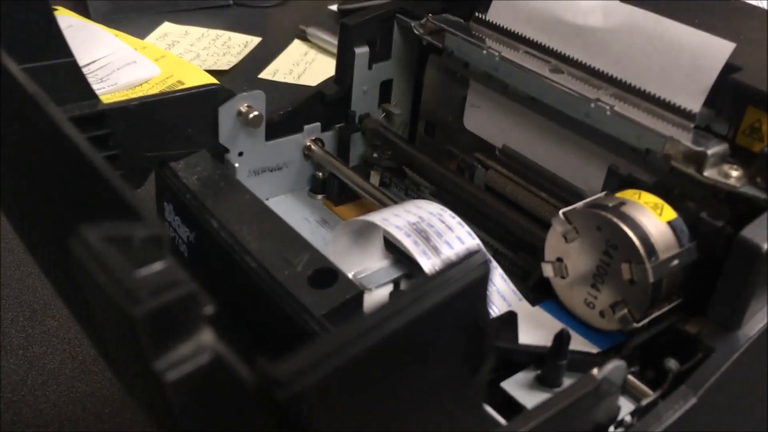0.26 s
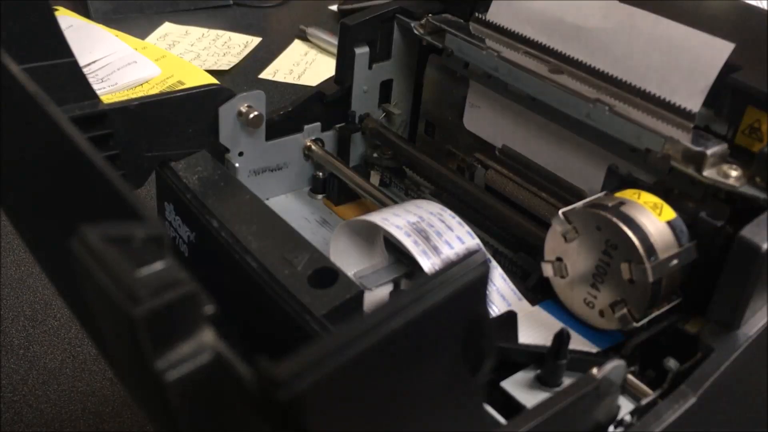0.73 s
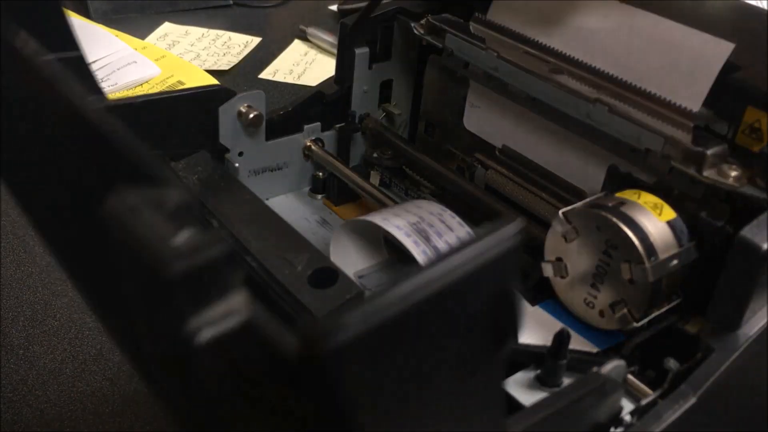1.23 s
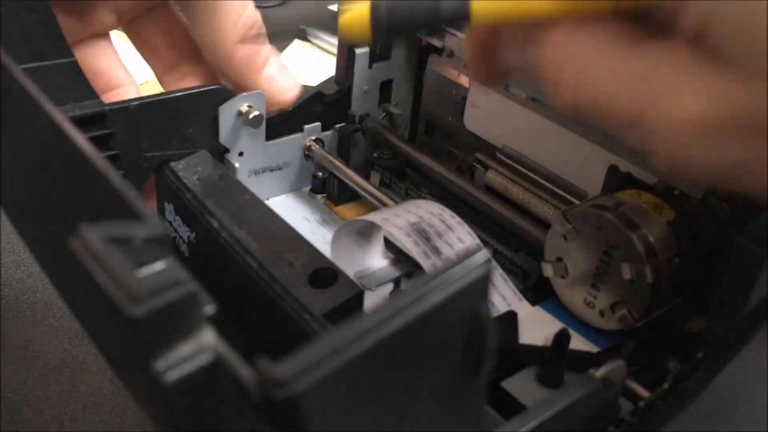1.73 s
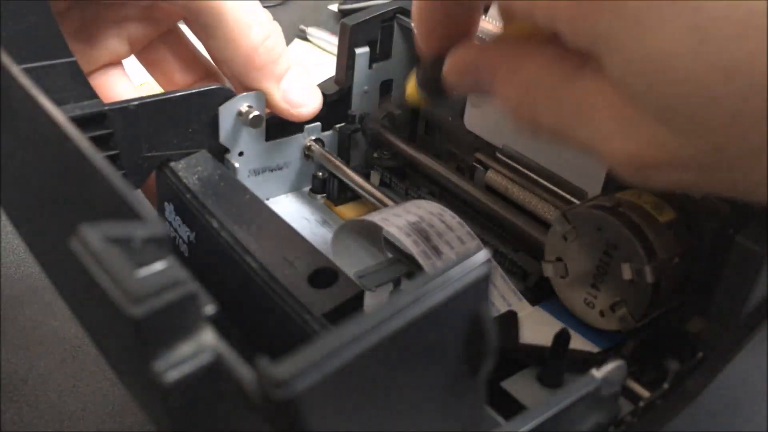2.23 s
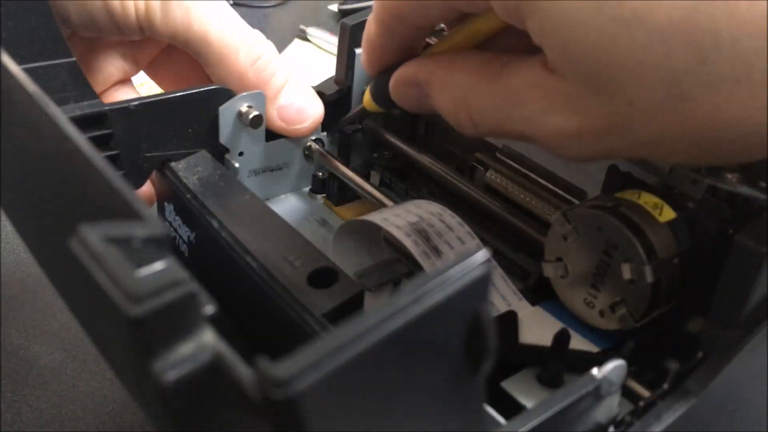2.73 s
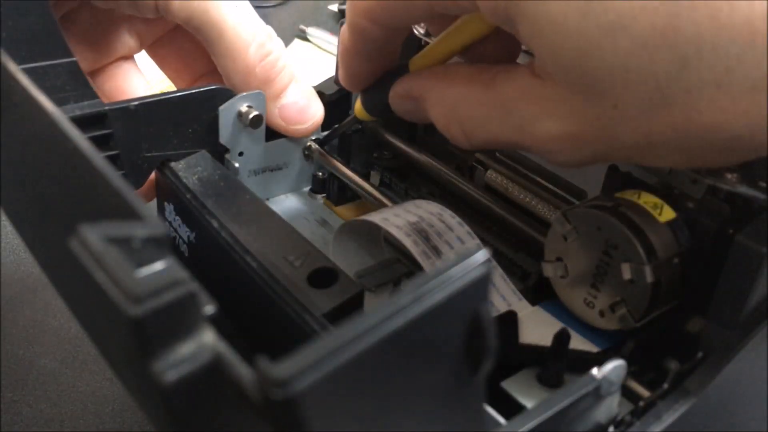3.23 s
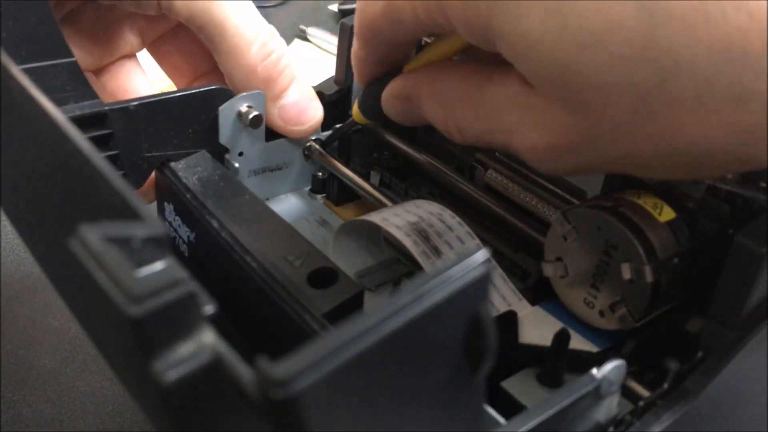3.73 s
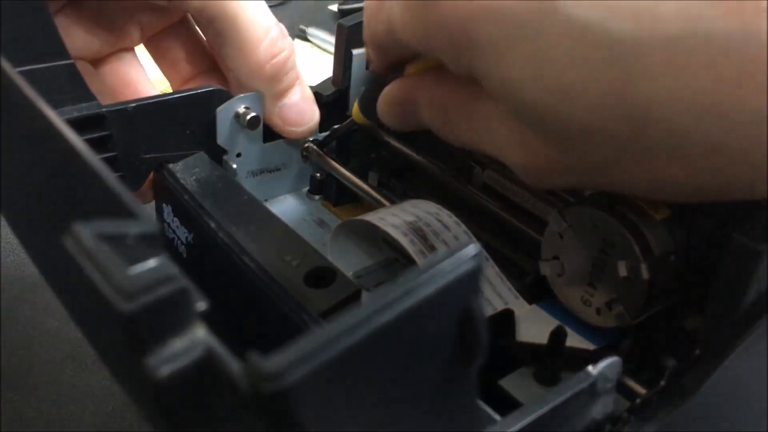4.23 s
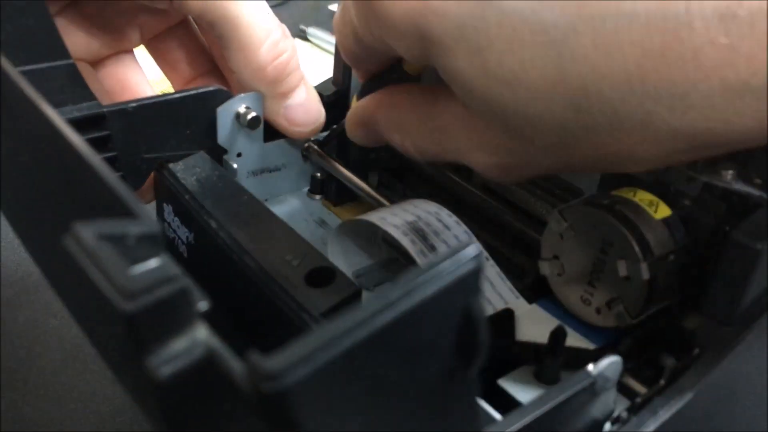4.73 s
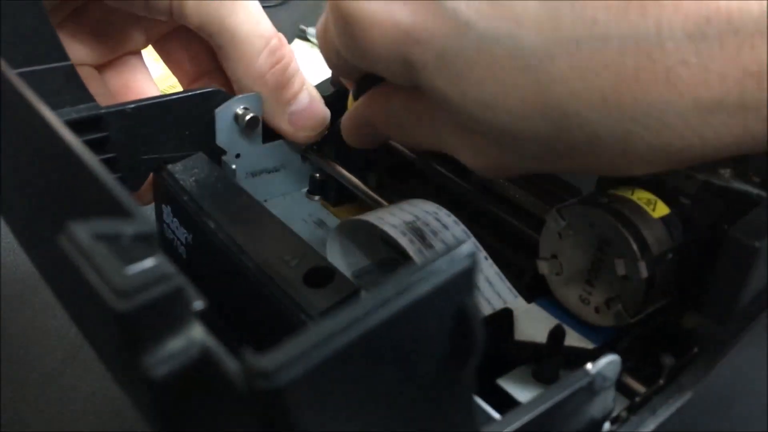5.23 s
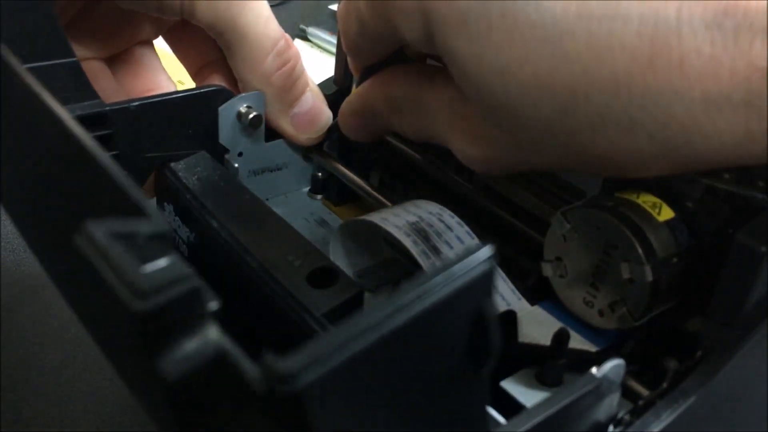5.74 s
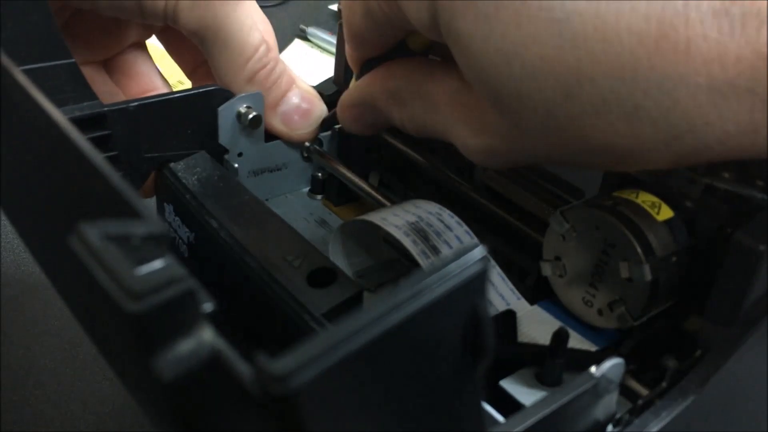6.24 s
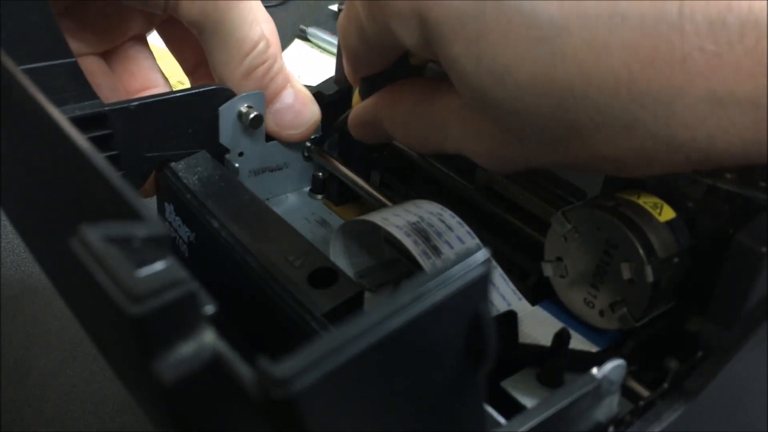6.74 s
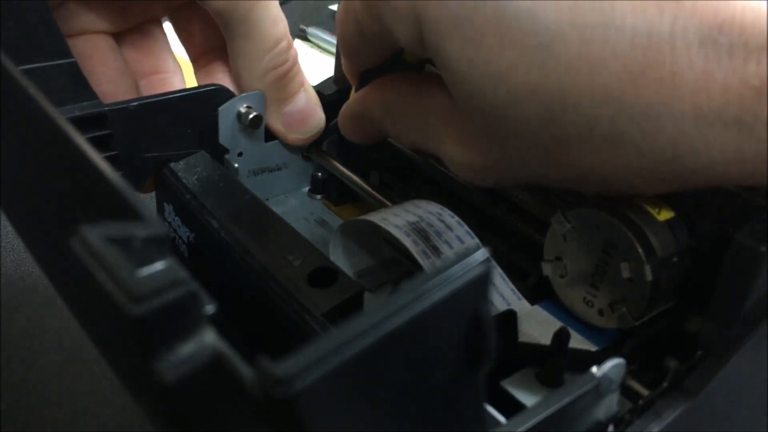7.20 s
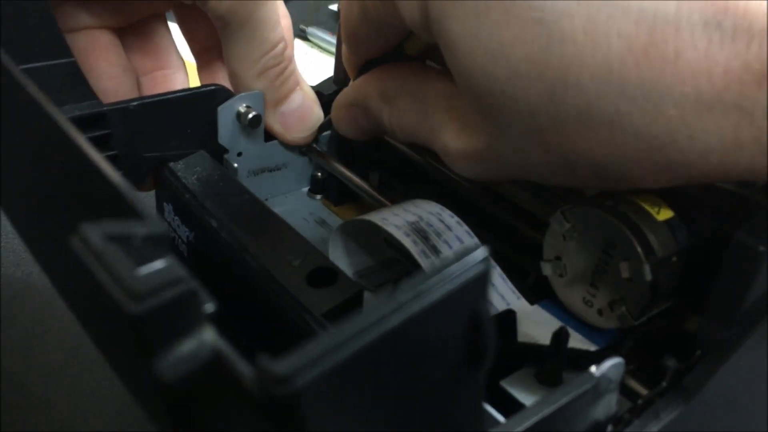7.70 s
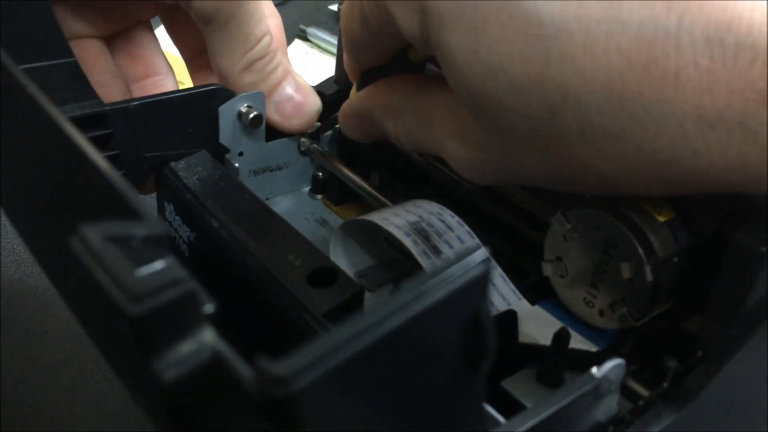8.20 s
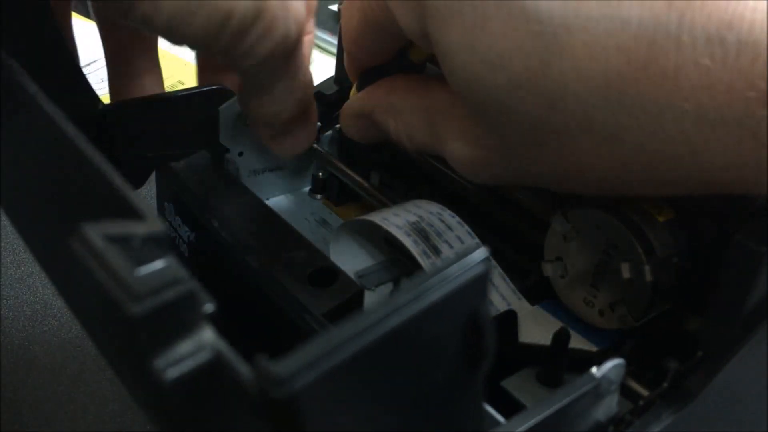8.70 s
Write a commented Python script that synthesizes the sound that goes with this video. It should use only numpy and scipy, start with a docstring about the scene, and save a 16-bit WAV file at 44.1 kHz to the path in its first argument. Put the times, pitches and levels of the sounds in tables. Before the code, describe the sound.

Close-up, in a small dry room with soft low rumble, faint hiss and tiny handling noises. The first second is nearly still, with a faint tick and a light plastic knock at 0.5. From 1.0 to 1.4 a loose metal tool is picked up: small jingles, then a quick cluster of crisp clacks and hollow case knocks. Low, woody desk creaks stutter until about 2.5. From 2.5 to 4.8 the work is delicate: sparse dry steel ticks, two sharper ones near 3.5, very light taps. Firmer slips knock the hollow plastic at 4.9 and, loudest so far, 5.4; a sharp tick comes at 6.1, more knocks at 7.0 and 7.2. At 7.5 the steel clip springs free with an extremely loud, bright, hissy crack and very short high ring. Solid hollow knocks follow at 7.8 and 8.2, with light ticks, finger rubbing and soft bumps to the end, about 9.

```python
"""A small screwdriver pries a steel circlip inside an open plastic machine case on a desk, close to a microphone.
Throughout, the tip ticks on steel (noise cracks, damped pitch), slips knock the hollow case (forced resonances)
and fingers rub it (jolted noise). From 1 s a loose tool jingles as it is picked up and, until 2.5 s, the desk creaks
under a leaning arm (stick-slip jerks). At 7.5 s the circlip springs free and rings (damped sines); work goes on.
A short room tail follows all this; under it lie room rumble, small contacts of the hands and microphone hiss."""
import sys
import numpy as np
from scipy import signal
from scipy.fft import rfft, irfft, next_fast_len
from scipy.io import wavfile
from scipy.ndimage import uniform_filter1d, map_coordinates

SR = 44100
rng = np.random.default_rng(int(sys.argv[2]) if len(sys.argv) > 2 else 0)


def bounce(signal):
    """Save signal as a 16-bit WAV file at the path given by the first command-line argument."""
    frames = np.transpose(np.atleast_2d(signal))
    limited = np.clip(frames, -1, 1)
    pcm = np.round(limited * 32767).astype(np.int16)
    wavfile.write(sys.argv[1], SR, pcm)


N = 395136

# Tip on steel: (time [s], nominal level [dB], relative low part [dB], strongest pitch [Hz], its relative level [dB])
TICK_EVENTS = [(0.0242, -51.5, 7, 4060, -18), (0.4968, -42.5, 4, 4320, -22), (1.0311, -48, -5, 5570, -6),
               (1.0898, -41, -6, 6220, -11), (1.1134, -36, -8.5, 9570, -11), (1.1953, -51, -4, 6030, -2),
               (1.2083, -41, -5, 6010, -10), (1.3067, -23.5, -1.5, 8880, -12),
               (1.3239, -29.5, 2.5, 5900, -3), (1.3918, -39, 5, 4250, -14), (1.4039, -31, 4, 4400, -13),
               (1.4099, -20.5, -6, 4500, -13.5), (1.4329, -30, -4, 4700, -10),
               (1.921, -35.5, -24, 7190, -11), (2.2009, -42, -20, 4170, -9.5),
               (2.263, -55.5, -5, 4240, 2.5), (2.5726, -42.5, -13, 5500, -13),
               (2.6372, -40, -9.5, 5700, -12.5), (2.7763, -48, -14, 4260, -18),
               (2.836, -38, -14, 13900, -25), (3.0492, -37.5, -11.5, 5700, -18),
               (3.272, -45.5, -8, 5600, -13), (3.326, -38.5, -14, 5660, -19), (3.3947, -53, -9, 5560, -7),
               (3.4285, -46.5, -10.5, 11700, -12), (3.4964, -44, -8, 15100, -10),
               (3.5064, -25, -21, 12100, -18), (3.5497, -42, -6, 5900, -3), (3.5674, -24, -13, 12400, -10),
               (3.6548, -45.5, -8, 11700, -12), (3.9413, -41.5, -13, 5940, -20),
               (4.2044, -43, -21, 4160, -7), (4.2825, -45, -24, 11000, -11), (4.3745, -48, -7, 12000, -10),
               (4.4753, -46.5, -6, 6700, -16), (4.663, -37.5, -8.5, 11550, -6),
               (4.7136, -38.5, -8.5, 7200, -18), (4.7258, -46, -8, 12300, -10),
               (4.9186, -28.5, -12.5, 8630, -17), (4.9927, -48, -9, 12000, -14),
               (5.038, -40.5, -9, 12200, -9), (5.2131, -51.5, -6, 4300, -15),
               (5.3572, -35.5, -7.5, 4560, -19), (5.3976, -25.5, -9, 5260, -16),
               (5.572, -44, -9, 6700, -16), (6.0743, -42.5, -4, 13500, -13),
               (6.094, -22.5, -10.5, 4400, -20), (6.2833, -54.5, 4, 4150, -18),
               (6.354, -45.5, -7, 4300, -12), (6.3917, -30, -12, 4170, -16),
               (6.456, -40.5, -16, 11900, -14), (6.5998, -48.5, -4, 12500, -10), (6.6466, -53, 7, 3860, -8),
               (6.7267, -47, -5.5, 3980, -12), (6.7612, -45, -10, 12100, -10), (6.771, -43, -3, 4500, -21),
               (6.805, -57, 8.5, 6200, -14), (6.9302, -47.5, -13, 11900, -12),
               (7.007, -46.5, -8, 11140, -8), (7.1657, -38, -6, 5150, -15), (7.454, -65, 7, 13700, -10),
               (7.4797, -4.5, -17, 14000, -12), (7.7618, -40, 1, 5200, -10), (7.91, -54.5, 1, 3950, -16),
               (7.949, -48.5, -2.5, 9600, -17), (8.0018, -46, -7, 4400, -16), (8.0396, -47, -3, 4270, -8),
               (8.0663, -49.5, -6, 6200, -14), (8.1723, -35.5, -2.5, 5250, -12),
               (8.338, -55, -3, 11800, -9), (8.3627, -42, -9, 7000, -12)]
# Crack spectrum: (frequency [Hz], relative density [dB])
CRACK_SPECTRUM = [(1200, -7), (2500, -1), (4000, -3.5), (6000, -5.5), (8000, -5.5), (12000, -4),
                  (15000, -5.5), (16400, -24.5)]
CRACK_SCALE_S, SKID_S, SPLIT_HZ = 0.018, 0.0017, 6000
# Light touches at random while the tip works
FAINT_PER_S, FAINT_FLOOR_DB, FAINT_SPREAD_DB, FAINT_PITCH_DB, WORK_FROM_S = 4.7, -62.5, 2, -3, 1.2

# Circlip springing free: (time [s], nominal level [dB])
SNAP_EVENT = (7.481, -36)
# Circlip modes: (frequency [Hz], relative level [dB], t60 [s])
CLIP_MODES = [(1520, 4, .05), (2606, -2, .06), (9540, -3, .06), (9840, 0, .06), (11170, -3, .07),
              (11550, -2, .07), (13950, 2, .06), (14200, 2, .06), (15270, -2, .07)]
# Loose tool picked up: (time [s], nominal level [dB])
JINGLE_EVENTS = [(1.0314, -78), (1.0413, -60.5), (1.0897, -62), (1.114, -50.5), (1.1942, -76),
                 (1.2093, -47)]
# Tool shaft modes: (frequency [Hz], relative level [dB], t60 [s])
SHAFT_MODES = [(2510, -2, 0.069), (5460, -2, 0.037), (6040, 9, 0.025), (9620, 7, 0.018)]

# Blows on the case: (time [s], nominal level [dB], relative desk thump [dB], relative case floor [dB],
# relative thin panels [dB], wall pitch favoured by the struck spot [Hz])
KNOCK_EVENTS = [(0.024, -49, -14, -9, -2, 528), (0.499, -37.5, -31, -7.5, -6.5, 770),
                (0.907, -46.5, -13, 2.5, -29, 438), (1.085, -51, -36, -16, -24, 415),
                (1.309, -36.5, -2, -26, -8, 452), (1.324, -42, 3.5, 1, -7, 334),
                (1.403, -35, -13, -5, -5, 444), (1.414, -31, -11, -13, -4.5, 660),
                (1.43, -32, -9.5, -12, 0, 947), (1.873, -39.5, -1, -7, -14.5, 480),
                (2.876, -57.5, -14, -11, -6, 627), (2.922, -55, -6, -22, -3, 444),
                (2.999, -55.5, -1, -23, -14, 583), (3.053, -50, -8, -23, -0.5, 412),
                (3.322, -61.5, 1, 1, 2.5, 466), (3.507, -56.5, -13, -18, -3, 363),
                (3.565, -51, -17, -28, 1, 536), (3.768, -52.5, -9, -22, -13, 455),
                (3.943, -50.5, 1, -7.5, -8.5, 394), (4.205, -49.5, -8, -24, -7, 638),
                (4.479, -57, -12, -10, -2, 334), (4.715, -54, -5, -6, -3, 331),
                (4.942, -30.5, -6.5, -10.5, -14, 564), (5.037, -53, -1, -16, -8.5, 579),
                (5.189, -51.5, -11, -17, -8.5, 336), (5.398, -21, -7.5, -13.5, -12, 565),
                (5.569, -44, -5, -4, -11, 331), (5.614, -52.5, -11, -3, -3.5, 829),
                (5.679, -58, 2, -18, -4.5, 635), (5.832, -48, -9, -12, -15, 650),
                (5.949, -58, -9, -21, -2, 851), (6.02, -55, -10, -11, -11, 471),
                (6.09, -40, 0.5, -15, -4, 390), (6.183, -57, -4, -6, -30, 390),
                (6.286, -46, -4.5, -12, -6.5, 630), (6.333, -43.5, 0, -1, -11.5, 338),
                (6.647, -49, -10, -7, -3, 581), (6.771, -59.5, 2, -23, 4.5, 331),
                (6.805, -63, -4, -23, 8, 638), (6.911, -54, 6, -19, -6, 471),
                (6.976, -38.5, -2, -10, -16, 467), (7.107, -49.5, -7, -19, -8, 624),
                (7.168, -29, -7.5, -9, -13.5, 587), (7.26, -53.5, -15, -11, -10, 463),
                (7.311, -60, -4, 5, -21, 401), (7.334, -57, -5, 6, -23, 331),
                (7.359, -50, -11, -15, -37, 400), (7.383, -56.5, -5, -8, -26, 377),
                (7.407, -41.5, -13, -8, -34, 416), (7.482, -25.5, -12.5, -15.5, -10, 479),
                (7.624, -56, -7, -8, -21, 331), (7.764, -21.5, -9, -8, -9, 468),
                (7.999, -55.5, 1, -6, -5, 589), (8.043, -64, 1, -12, 4.5, 425),
                (8.07, -58.5, -19, -16, -1, 479), (8.171, -25, -10, -10, -13.5, 560),
                (8.467, -49, -8, 4.5, -22, 431), (8.551, -49.5, 0, 5.5, -26, 678),
                (8.78, -50.5, 0.5, -5, -12, 653), (8.86, -39, -9, -14, -15, 660)]
# Case wall modes: (frequency [Hz], width [Hz], relative level [dB])
WALL_MODES = [(340.4, 67, -1.5), (395.5, 96, -2), (479, 95, 2), (572, 142, 2), (640, 115, 2.5),
              (770, 142, -2), (882, 99, -4.5)]
# Thin panel modes: (frequency [Hz], width [Hz], relative level [dB])
PANEL_MODES = [(997, 400, -3.5), (1210, 94, 3.5), (1237, 45, 4), (1504, 273, -1.5), (1743, 81, -1.5),
               (2320, 270, -10), (3260, 730, -17.5)]
# Case floor modes: (frequency [Hz], width [Hz], relative level [dB])
FLOOR_MODES = [(144, 59, -3.5), (166.3, 31.7, 1.5), (215, 20, -4), (295, 16.7, -12.5)]
# Desk modes: (frequency [Hz], width [Hz], relative level [dB])
DESK_MODES = [(58.1, 11.4, -0.5), (114.4, 20, 4)]
CONTACT_SCALE_S, PUSH_RISE_S = 0.0091, 0.0024
PRESS_LEAD_S, LOWER_DELAY_S = 0.001483, 0.0025  # contact starts before the listed time; floor and desk lag it

# Scrapes and rubs: (start [s], length [s], level through the case [dB], gritty treble level [dB])
RUB_EVENTS = [(0, 0.033, -70, -88), (0.143, 0.26, -86, -73), (1.3, 0.034, -42, -53),
              (1.35, 0.061, -53, -57), (1.394, 0.05, -51.5, -76), (1.436, 0.048, -51.5, -60.5),
              (1.468, 0.064, -58.5, -53), (1.598, .14, -59, -62), (1.862, 0.11, -67.5, -62.5),
              (2.17, 0.051, -70, -70), (2.312, 0.15, -69, -72.5), (4.178, 0.059, -60.5, -61.5),
              (4.274, 0.017, -88, -69.5), (4.874, 0.1, -60.5, -70.5), (5.008, 0.043, -67, -70),
              (5.554, 0.033, -48.5, -80), (6.09, 0.024, -45, -63), (6.329, 0.087, -64, -69),
              (6.415, 0.094, -64.5, -71), (6.988, 0.15, -68, -80), (7.3, 0.085, -77.5, -101),
              (7.451, 0.014, -51.5, -71), (7.5, 0.054, -73, -64), (7.583, 0.31, -77, -76),
              (8.309, 0.062, -56.5, -66.5), (8.43, 0.11, -61, -65.5), (8.521, .1, -61.5, -65),
              (8.72, 0.2, -64, -70), (8.855, 0.037, -51.5, -65.5), (8.874, 0.077, -66, -65.5)]
# Rubbing through the case: (frequency [Hz], relative density [dB])
SCUFF_SPECTRUM = [(150, -10), (300, 5), (600, -0.5), (1000, -3.5), (1600, -5), (2500, -17.5), (4000, -71)]
# Gritty treble: (frequency [Hz], relative density [dB])
GRIT_SPECTRUM = [(1200, -44), (2500, 4.5), (3500, 3.5), (5000, -6.5), (6000, -0.5), (9000, -4), (12000, -1),
                 (15500, -5), (16500, -64)]
RISE_SHARE, FADE_T60_S = 0.32, 0.052  # a stroke swells over this share of its length, holds, then dies

# Bouts of desk creaking, each a list of: (time [s], jerks so far [count], nominal level [dB])
CREAK_BOUTS = [
    [(1.033, 0, -56), (1.259, 6, -54)],
    [(1.583, 0, -50), (1.707, 4, -45), (1.837, 8, -50)],
    [(2.042, 0, -55), (2.126, 3, -42), (2.201, 6, -43), (2.264, 9, -48), (2.314, 11, -41), (2.433, 15, -43),
     (2.529, 17, -46)],
]
# Desk joint modes: (frequency [Hz], width [Hz], relative level [dB])
JOINT_MODES = [(179, 35, 4.5), (244, 24, 7), (430, 45, 1), (740, 280, -7.5), (970, 160, -5.5),
               (1390, 500, -19), (1606, 200, -16), (2350, 170, -27.5)]
JERK_JITTER_S, JERK_SPREAD_DB = 0.0015, 2.5

# Room decay: (frequency [Hz], t60 [s])
ROOM_DECAY = [(200, 0.28), (1000, 0.13), (4000, 0.082), (12000, 0.07)]

# Background: (time [s], rumble level [dB], handling level in the case [dB], hiss level [dB])
GROUND_LEVELS = [(0.0, -55, -59, -75), (0.3, -59, -64.5, -71.5), (0.87, -58, -67, -75.5),
                 (1.3, -57, -67.5, -74.5), (1.49, -52, -58, -67), (2.02, -55.5, -70.5, -75),
                 (2.32, -57, -61, -74.5), (2.54, -52, -73.5, -78.5), (2.82, -59.5, -69, -77.5),
                 (4.04, -57.5, -71, -78), (4.39, -57.5, -63, -74.5), (4.77, -57.5, -69.5, -79.5),
                 (6.81, -54, -70, -80), (7.39, -57, -66.5, -79), (7.68, -57.5, -69, -70.5),
                 (8.21, -56.5, -69.5, -80), (8.83, -57, -70.5, -69), (8.96, -51, -60, -67)]
# Room rumble: (frequency [Hz], relative density [dB])
RUMBLE_SPECTRUM = [(13, -6), (22, -13.5), (49, 4.5), (71, 0.5), (330, -29), (430, -27), (730, -120)]
# Handling in the case: (frequency [Hz], relative density [dB])
HANDLING_SPECTRUM = [(88, -39), (150, -1), (275, -5), (546, -10), (639, -10), (789, -18.5), (1170, -14.5),
                     (1930, -25), (2240, -24), (3500, -38.5), (4550, -75), (7700, -120)]
# Microphone hiss: (frequency [Hz], relative density [dB])
HISS_SPECTRUM = [(900, -58), (1800, -6), (2600, -1), (3600, -1), (4870, -7), (5900, -1.5), (7770, -7.5),
                 (9320, -0.5), (10300, -8.5), (12100, -0.5), (15100, -8.5), (15800, 7), (16500, -53)]

BASS_CORNER_HZ, TOP_HZ = 38, 16600


def ticks():
    """The tip skids in and bites: a noise crack in low and high parts, plus one heavily damped pitch."""
    events = np.vstack([TICK_EVENTS, faint_ticks()])
    time_s, level_db, low_db, pitch_hz, pitch_db = events.T[:, :, None]
    t = np.arange(SR // 16) / SR
    skid = amp(level_db) * np.minimum(t / SKID_S, 1) ** 3
    u = np.maximum(t - 0.0018, 0) / CRACK_SCALE_S
    decay = amp(-9.5 - 51 * u) + amp(-22 - 90 * u)
    burst = skid * decay * rng.standard_normal((len(events), len(t)))
    pitch = amp(pitch_db - 126 * u) * skid * np.sin(2 * np.pi * pitch_hz * t)

    def low_share(hz):
        """Smooth crossover gain of the low part."""
        return 1 / (1 + (hz / SPLIT_HZ) ** 6)

    start_s = np.maximum(time_s[:, 0] - 0.0015, 0)
    low = filtered(place(start_s, burst * amp(low_db + 9.5)),
                   lambda hz: amp(along(CRACK_SPECTRUM, hz)) * low_share(hz))
    high = filtered(place(start_s, burst),
                    lambda hz: amp(along(CRACK_SPECTRUM, hz)) * (1 - low_share(hz)))
    return low + high + place(start_s, pitch)


def faint_ticks():
    """Random rows like TICK_EVENTS for the lightest touches, with exponentially spread levels."""
    span_s = N / SR - WORK_FROM_S
    when, size, low, pitch = rng.random((int(FAINT_PER_S * span_s), 4)).T
    time_s = WORK_FROM_S + span_s * when
    level_db = FAINT_FLOOR_DB - FAINT_SPREAD_DB * np.log(size)
    pitch_hz = 4000 * 3.5 ** pitch
    return np.transpose([time_s, level_db, 18 * low - 16, pitch_hz, np.full(len(when), FAINT_PITCH_DB)])


def ringing(events, modes):
    """Struck steel as damped sines, their strengths redrawn for every touch."""
    time_s, level_db = np.transpose(events)[:, :, None]
    t = np.arange(SR // 8) / SR
    strength_db = rng.normal(0, 0.7, (len(time_s), len(modes)))
    sound = 0
    for k, (hz, mode_db, t60_s) in enumerate(modes):
        envelope = amp(level_db + mode_db + strength_db[:, [k]] - 60 * t / t60_s)
        sound = sound + envelope * np.sin(2 * np.pi * hz * t)
    return place(time_s[:, 0], sound)


def knocks():
    """A chattering contact shakes panels, walls and, a moment later, the floor; the desk takes a smooth push."""
    time_s, level_db, thump_db, floor_db, panel_db, spot_hz = np.transpose(KNOCK_EVENTS)[:, :, None]
    u = np.arange(SR // 7) / SR / CONTACT_SCALE_S * np.ones(time_s.shape)
    chatter = rng.standard_normal(u.shape) * np.sqrt(u)
    force = chatter * (np.exp(-3.5 * u) + 0.077 * np.exp(-1.1 * u))
    # light panels: a quicker first burst, then a stronger rattling tail
    tap = chatter * (np.exp(-4.5 * u) + 0.15 * np.exp(-1.2 * u))
    push = -u * np.exp(-u * CONTACT_SCALE_S / PUSH_RISE_S)
    # wall modes lose 5 dB per octave away from the spot's pitch
    spot_modes = [(hz, width_hz, mode_db - 5 * np.abs(np.log2(hz / spot_hz)))
                  for hz, width_hz, mode_db in WALL_MODES]
    walls = amp(-1.0) * body(force, spot_modes)
    panels = amp(panel_db + 5.5) * body(tap, PANEL_MODES)
    floor = amp(floor_db + 1.5) * body(force, FLOOR_MODES)
    thump = amp(thump_db + 1.5) * body(push, DESK_MODES)
    start_s = time_s[:, 0] - PRESS_LEAD_S
    upper = place(start_s, amp(level_db) * (walls + panels))
    return upper + place(start_s + LOWER_DELAY_S, amp(level_db) * (floor + thump))


def rubs():
    """Friction noise in strokes; the same jolts feed the case and the grit."""
    start_s, length_s, scuff_db, grit_db = np.transpose(RUB_EVENTS)[:, :, None]
    t = np.arange(SR // 2) / SR
    rise = np.minimum(t / (RISE_SHARE * length_s), 1) ** 2
    stroke = rise * amp(-60 * np.maximum(t - length_s, 0) / FADE_T60_S)
    scuff = place(start_s[:, 0], amp(scuff_db) * stroke) * noise(SCUFF_SPECTRUM, patchy_db=3.0)
    grit = place(start_s[:, 0], amp(grit_db) * stroke) * noise(GRIT_SPECTRUM, patchy_db=3.0)
    return jolts(260, spread_db=3.5, t60_s=0.085, steady=1.0) * (scuff + grit)


def jolts(rate_per_s, spread_db, t60_s, steady):
    """Friction catches at random with a sharp start and decay, over a steady part; running rms held near 1."""
    catches = (rng.random(N) < rate_per_s / SR) * amp(spread_db * rng.exponential(size=N).clip(0, 3))
    decay = amp(-60 * np.arange(SR // 8) / SR / t60_s)
    level = steady + signal.fftconvolve(catches, decay)[:N]
    return level / np.sqrt(uniform_filter1d(level ** 2, SR // 10))


def creak():
    """Each stick-slip jerk rings the joint: an impulse, a weaker opposite slip and faint dying noise."""
    time_s, level_db = slips().T[:, :, None]
    t = np.arange(SR // 40) / SR
    second_s = np.round(rng.uniform(0.00635, 0.0101, time_s.shape) * SR) / SR
    rough = 0.023 * rng.standard_normal((len(time_s), len(t))) * amp(-60 * t / 0.052)
    jerk = (t == 0) - 0.41 * np.isclose(t, second_s) + rough
    return place(time_s[:, 0], amp(level_db) * body(jerk, JOINT_MODES))


def slips():
    """One jittered row (time [s], nominal level [dB]) per jerk, interpolated along each bout."""
    rows = []
    for bout in CREAK_BOUTS:
        time_s, count, level_db = np.transpose(bout)
        k = np.arange(count[-1] + 1)
        rows += list(zip(np.interp(k, count, time_s), np.interp(k, count, level_db)))
    return np.array(rows) + rng.standard_normal((len(rows), 2)) * [JERK_JITTER_S, JERK_SPREAD_DB]


def room(x):
    """A delayed noise tail of unit energy in which each frequency dies at its own speed."""
    hz, t, z = signal.stft(rng.standard_normal(SR // 2), SR, nperseg=256)
    decay = amp(-60 * t / along(ROOM_DECAY, hz)[:, None])
    tail = signal.istft(z * decay, SR, nperseg=256)[1]
    delayed = np.pad(x, (200, 0))  # samples
    return signal.fftconvolve(delayed, tail / np.linalg.norm(tail))[:N]


def ground():
    """Room rumble, the hands' small contacts in the case and microphone hiss: coloured noises of drifting level."""
    time_s, *columns = np.transpose(GROUND_LEVELS)
    rumble_db, handling_db, hiss_db = [np.interp(np.arange(N) / SR, time_s, c) for c in columns]
    rumble_gain = amp(rumble_db + 1.7 * wobble(12) + 1.5 * wobble(4))
    rumble = rumble_gain * noise(RUMBLE_SPECTRUM, patchy_db=1.2)
    contacts = jolts(45, spread_db=0.5, t60_s=0.071, steady=0.9)
    handling = amp(handling_db + 1.5 * wobble(6)) * contacts * noise(HANDLING_SPECTRUM, patchy_db=2.5)
    hiss = amp(hiss_db + 1.3 * wobble(27)) * noise(HISS_SPECTRUM, patchy_db=1.5)
    return rumble + handling + hiss


def body(force, modes):
    """Rows of force through causal resonances of alternating sign, each answer scaled to peak 1."""
    size = 2 ** 13
    f = np.fft.rfftfreq(size, 1 / SR)
    response = 0
    for k, (hz, width_hz, mode_db) in enumerate(modes):
        damping = 1j * f * width_hz
        response = response + (-1) ** k * amp(mode_db) * damping / (hz * hz - f * f + damping)
    sound = irfft(rfft(force, size) * response, size)
    return sound / np.abs(sound).max(axis=1, keepdims=True)


def noise(spectrum, patchy_db):
    """Coloured noise of rms 1 with small time-frequency patches of random gain."""
    z = signal.stft(rng.standard_normal(N), nperseg=512)[2]
    field = uniform_filter1d(uniform_filter1d(rng.standard_normal(z.shape), 3, 0), 5, 1)
    patchy = signal.istft(z * amp(patchy_db * unit(field)), nperseg=512)[1][:N]
    return unit(filtered(patchy, lambda hz: amp(along(spectrum, hz))))


def wobble(knots_per_s):
    """A smooth random curve through random knots."""
    knots = rng.standard_normal(int(N * knots_per_s / SR) + 4)
    return map_coordinates(knots, [np.arange(N) * knots_per_s / SR])


def place(times_s, sounds):
    """One row of sound laid down at each time."""
    start = np.round(np.asarray(times_s) * SR).astype(int)[:, None]
    at = start + np.arange(sounds.shape[1])
    return np.bincount(at.ravel(), sounds.ravel(), N + sounds.shape[1])[:N]


def filtered(x, response):
    """x times a response that is a function of frequency in Hz."""
    m = next_fast_len(N + SR // 2)
    return irfft(rfft(x, m) * response(np.fft.rfftfreq(m, 1 / SR)), m)[..., :N]


def along(points, hz):
    """(frequency [Hz], value) points interpolated on a log frequency axis."""
    f, v = np.transpose(points)
    return np.interp(np.log(hz + 1), np.log(f + 1), v)


def unit(x):
    """x scaled to rms 1."""
    return x / np.sqrt(np.mean(x ** 2) + 1e-20)


def amp(db):
    """Amplitude factor of a level in dB."""
    return 10 ** (np.asarray(db) / 20)


def scene():
    """Steel, case and desk heard directly and through the room, over the background."""
    circlip = ringing([SNAP_EVENT], CLIP_MODES)
    loose_tool = amp(-7.5) * ringing(JINGLE_EVENTS, SHAFT_MODES)
    near = ticks() + circlip + loose_tool + knocks() + rubs()
    desk = creak()
    reverb = room(amp(-12.5) * near + amp(-11.5) * desk)
    return (near + desk + reverb + ground())[None]


def record(dry):
    """The microphone rolls off its lowest bass; nothing is kept above the band limit."""
    return filtered(dry, lambda hz: (1j * hz / (BASS_CORNER_HZ + 1j * hz)) ** 2 * (hz < TOP_HZ))


dry = scene()
out = record(dry)
bounce(out)
```